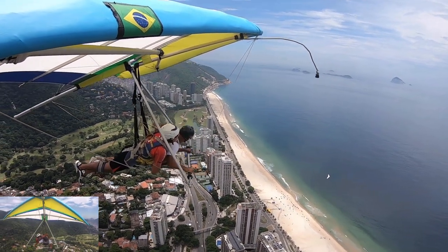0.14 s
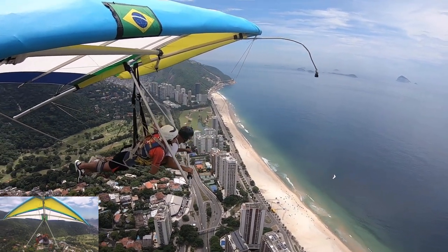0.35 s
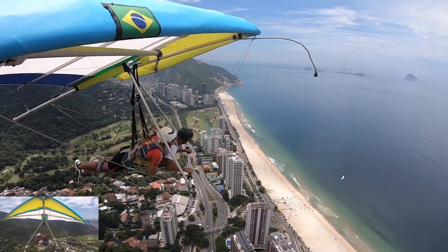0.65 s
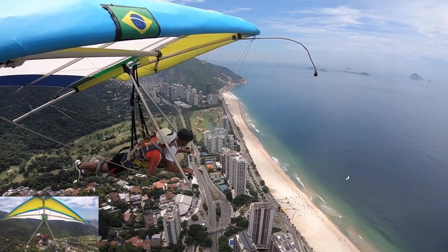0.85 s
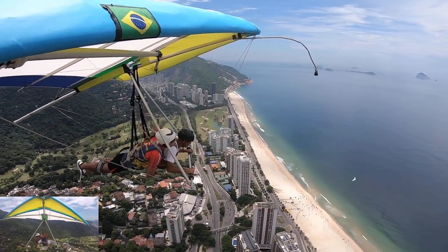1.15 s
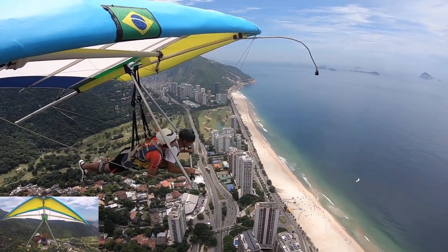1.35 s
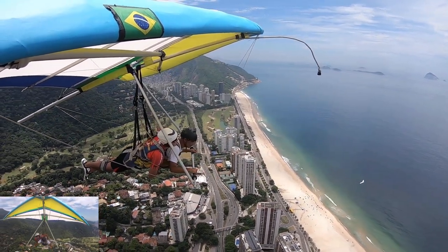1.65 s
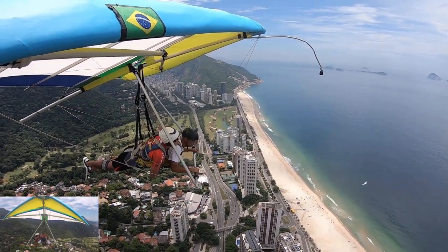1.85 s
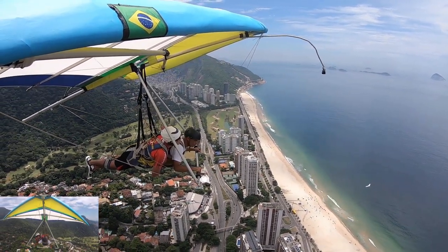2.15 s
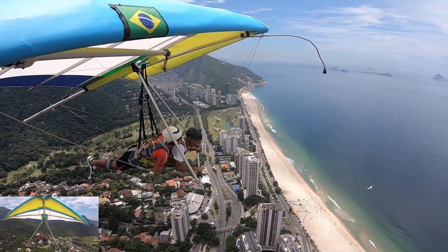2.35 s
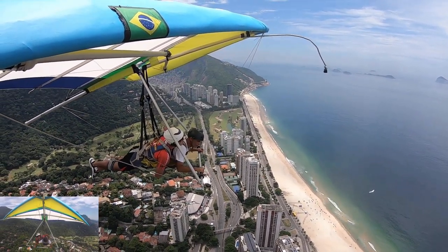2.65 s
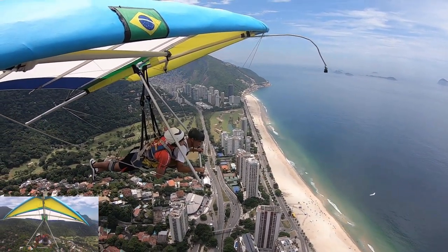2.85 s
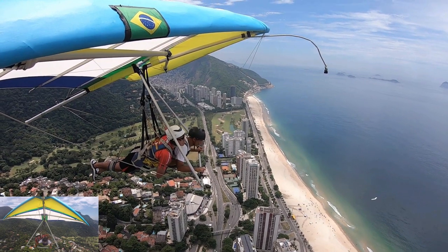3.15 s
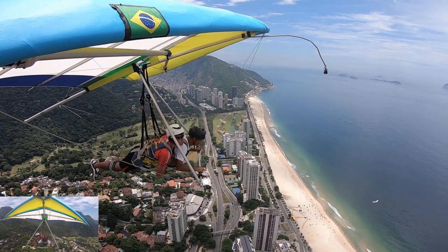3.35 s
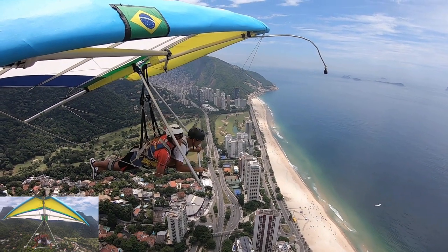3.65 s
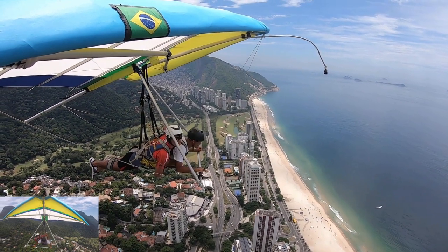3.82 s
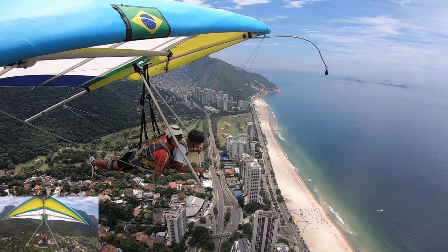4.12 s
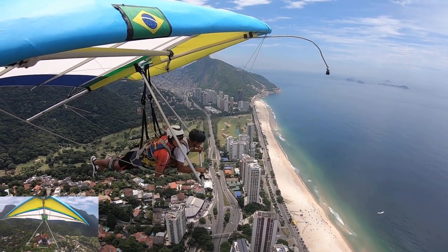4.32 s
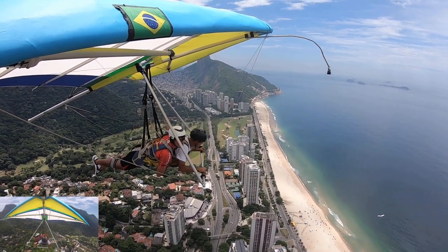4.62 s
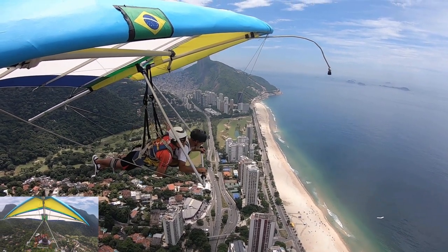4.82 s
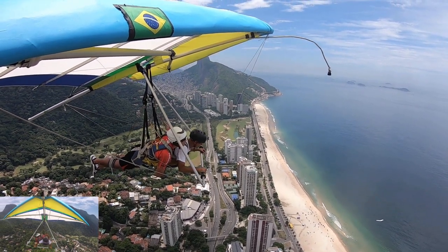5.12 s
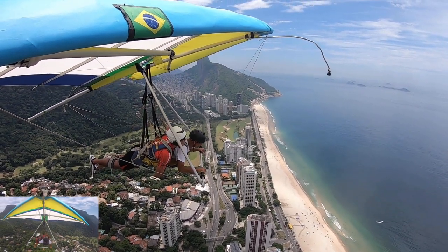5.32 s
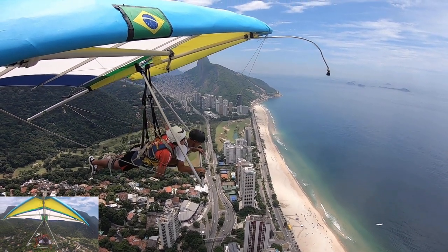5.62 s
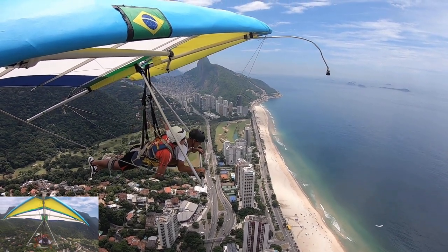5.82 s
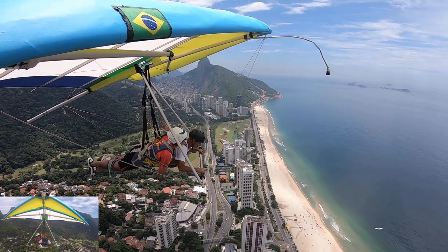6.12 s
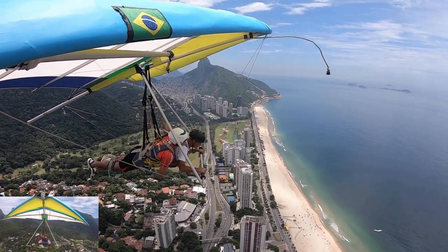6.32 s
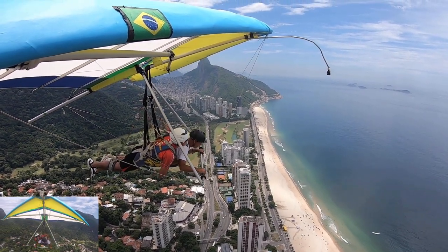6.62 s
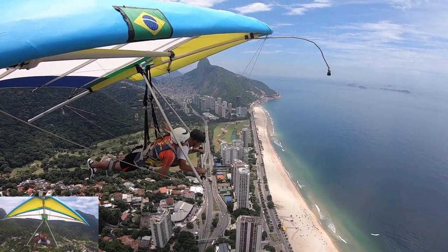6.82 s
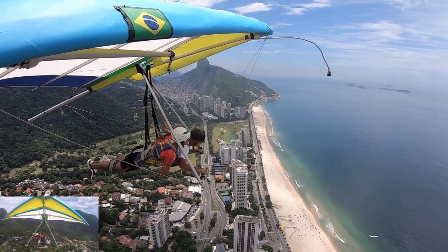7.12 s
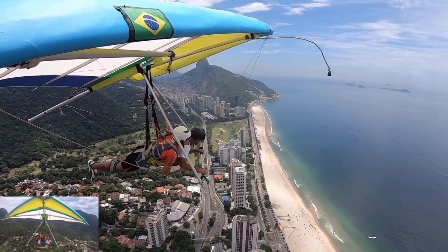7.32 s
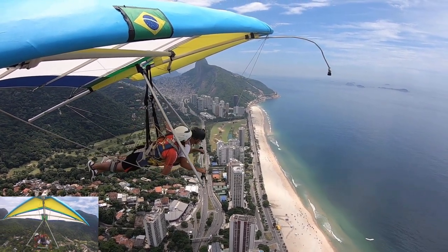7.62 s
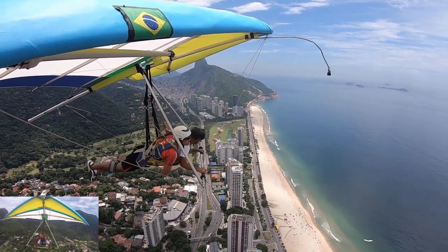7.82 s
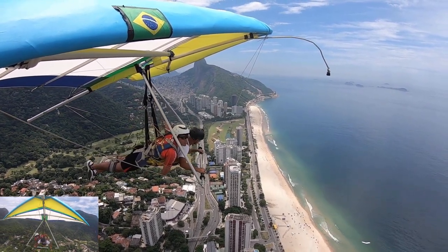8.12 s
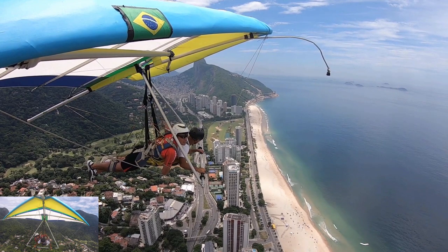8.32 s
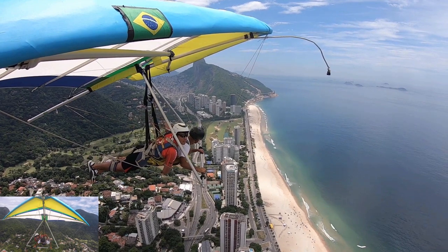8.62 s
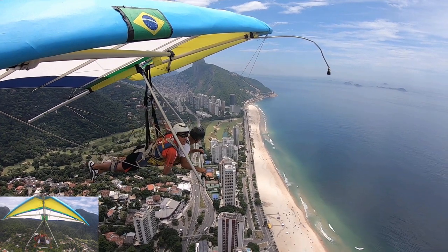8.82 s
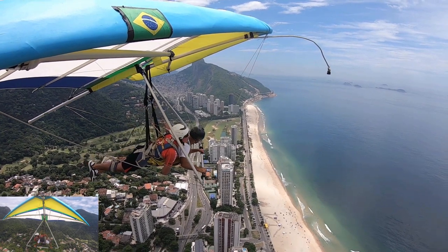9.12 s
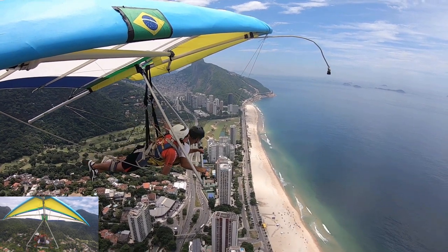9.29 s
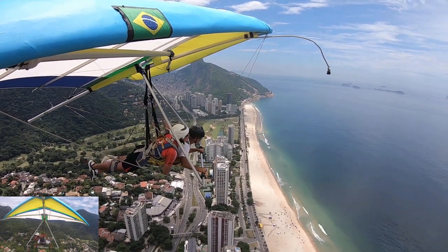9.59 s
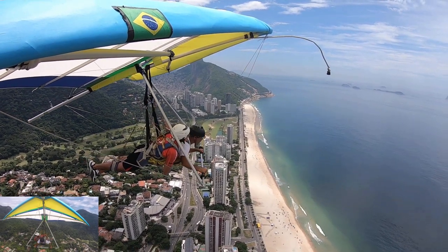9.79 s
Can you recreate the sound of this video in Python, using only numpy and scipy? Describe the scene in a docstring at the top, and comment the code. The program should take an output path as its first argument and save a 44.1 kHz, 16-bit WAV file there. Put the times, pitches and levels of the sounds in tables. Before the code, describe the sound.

A close microphone on a hang glider's wing in steady flight, outdoors with no reverberation. From 0 to 10 seconds wind presses on it as a deep, uneven rumble, mostly below 150 Hz, with lumpy swells, one slightly heavier near 5.2. A faint, steady hiss of air over the sail lies above, with nothing very bright. From about 0.3 a breathy, unstable whistle of noise around 2.5 kHz flutters and ticks rapidly, fairly continuous until roughly 2.8, weaker until 3.4, then full again until about 5. Afterwards it breaks into short, irregular puffs with gaps, continuing to the end. Throughout, tiny millisecond flicks and soft clicks scatter at random, the stronger ones denser before 5 seconds. At about 7.05 and 7.2 two very faint, short, pure high tones near 5.3 kHz sound, almost buried. The wind continues unbroken to the end.

```python
"""A microphone on a glider wing in steady flight. Throughout, turbulent air presses on it as a low rumble (shaped noise),
small eddies flick past its port (short swelling tones), and the airstream over the sail hisses faintly (bright noise).
The shear layer over the port blows its cavity (noise through a resonance): fairly steadily in the first seconds,
again from about 3.5 s, and in broken puffs after about 5 s. Just after 7 s come two faint, short, steady high tones
of unknown source (a sine)."""
import sys
import numpy as np
from scipy import signal
from scipy.fft import rfft, irfft, next_fast_len
from scipy.io import wavfile
from scipy.ndimage import uniform_filter1d

SR = 44100
rng = np.random.default_rng(int(sys.argv[2]) if len(sys.argv) > 2 else 0)


def generate_wav(sig):
    """Save sig (samples, or channels by samples) to the path in sys.argv[1] as 16-bit PCM at SR."""
    pcm = np.round(np.clip(np.atleast_2d(sig).T, -1, 1) * 32767).astype(np.int16)
    wavfile.write(sys.argv[1], SR, pcm)


N = 438794


def from_db(db):
    """Decibels to gain."""
    return 10 ** (np.asarray(db) / 20)


def rms_one(x):
    """Scale to unit rms."""
    return x / np.sqrt(np.mean(x ** 2) + 1e-20)


def in_time(rows):
    """Each column of a table as a value per sample, in straight lines between rows."""
    seconds, *columns = np.transpose(rows)
    return [np.interp(np.arange(N) / SR, seconds, column) for column in columns]


def drift(rate_hz):
    """Slow chance: noise twice through a one-pole low-pass; spread 1."""
    r = np.exp(-2 * np.pi * rate_hz / SR)
    slow = signal.lfilter([1], [1, -2 * r, r * r], rng.standard_normal(N + SR))
    return rms_one(slow[SR:])   # the first second lets the filter settle


def coloured(spectrum):
    """Noise with the given spectrum; rms 1."""
    size = next_fast_len(N)
    hz = np.maximum(np.arange(size // 2 + 1) * SR / size, 1)
    points = np.array(spectrum)
    gain = from_db(np.interp(np.log(hz), np.log(points[:, 0]), points[:, 1]))
    return rms_one(irfft(rfft(rng.standard_normal(size)) * gain, size)[:N])


def swells(rows, edge_s):
    """Rise, hold and fall for each row of start, length and height."""
    steps = np.zeros(N)
    for start_s, length_s, height in rows:
        steps[int(start_s * SR):int((start_s + length_s) * SR)] = height
    return uniform_filter1d(steps, size=max(int(edge_s * SR), 1))


def low_pass(x, hz, run=signal.sosfilt):
    """Second-order low-pass."""
    return run(signal.butter(2, hz, fs=SR, output="sos"), x)


# The airstream. Each row: time in seconds, deep buffet in dB, fine buffet in dB, middle of the hiss level in dB.
AIRSTREAM = [(0.0, -33, -32.5, -56), (0.05, -30, -34, -59), (1.58, -31.5, -32, -61),
             (2.13, -28.5, -33, -60), (4.57, -31, -32.5, -61.5), (5.18, -26.5, -35, -60),
             (5.54, -30.5, -33.5, -60.5), (6.07, -28.5, -34, -60), (7.29, -29, -33.5, -59.5),
             (8.01, -28.5, -34.5, -59.5), (9.67, -32, -33.5, -59), (9.84, -28.5, -33, -59.5),
             (9.95, -27, -35, -60)]


def airstream():
    """The slow course of the wind: levels of deep buffet, fine buffet and hiss."""
    return in_time(AIRSTREAM)


# Faint, short, steady high tones of unknown source. Each row: start in seconds, length in seconds.
FAINT_TONES = [(7.05, .09), (7.2, .07)]
TONE_HZ, TONE_DB, TONE_EDGE_S = 5315, -69, 0.02


def faint_tones():
    """A faint sine of steady pitch that rises, holds and falls."""
    level = swells([(start_s, length_s, from_db(TONE_DB)) for start_s, length_s in FAINT_TONES], TONE_EDGE_S)
    return level * np.sqrt(2) * np.sin(2 * np.pi * TONE_HZ * np.arange(N) / SR)


# Colour of the hiss. Each row: frequency in Hz, relative level in dB per Hz.
HISS_SPECTRUM = [(2500, -21.5), (3500, -3), (4200, 0.5), (5200, 1), (6500, -4.5), (7900, -9.5), (9000, -24)]


def hiss(level_db):
    """Air over the sail: bright noise whose level flickers by chance."""
    return from_db(level_db + 0.68 * drift(42)) * coloured(HISS_SPECTRUM)


# The flow over the port between puffs. Each row: time in seconds, blowing in dB, port pitch in Hz when the
# flow clings fully and before it wanders, attachment in spreads of chance.
STEADY_FLOW = [(0, -49, 2670, 0.33), (.28, -47.5, 2630, .4), (.33, -42.5, 2560, 1.6), (.8, -42, 2536, 1.85),
               (2, -42, 2600, 1.8), (2.8, -42.5, 2650, 0.65), (3.3, -45, 2700, .6), (3.45, -43, 2680, 2.5),
               (4.2, -42, 2520, 2.1), (4.8, -42.5, 2500, 2.3), (5.1, -47, 2510, 0.36),
               (6.5, -46.5, 2490, 0.54), (7.5, -46.5, 2640, 0.42), (8.5, -48.5, 2650, 0.54),
               (9.95, -46.5, 2620, .55)]
# Puffs of air across the port. Each row: start in seconds, length in seconds, blowing in dB before edge smoothing.
AIR_PUFFS = [(.2, 0.05, -42), (0.806, 0.03, -38.5), (0.96, 0.062, -40.5), (1.58, 0.045, -42.5),
             (3.24, 0.027, -40.5), (3.302, 0.017, -39), (3.553, 0.071, -38), (4.522, 0.029, -40),
             (4.683, 0.052, -40.5), (4.98, 0.046, -41.5), (5.148, 0.068, -44), (5.275, 0.052, -45.5),
             (5.34, .098, -46), (5.478, 0.04, -42), (5.596, 0.032, -44), (5.636, 0.12, -44),
             (5.837, 0.06, -43.5), (6.07, 0.023, -42), (6.116, 0.1, -45), (6.317, .06, -44.5),
             (6.379, 0.038, -44), (6.454, 0.033, -45.5), (6.825, 0.044, -46), (7.199, 0.032, -38),
             (7.264, 0.076, -45), (7.336, 0.12, -41.5), (7.552, 0.041, -45), (7.732, 0.055, -46),
             (7.848, .041, -44), (7.934, 0.04, -44), (8.042, 0.046, -44), (8.127, .04, -45.5),
             (8.268, 0.023, -42), (8.4, 0.046, -40.5), (8.5, 0.11, -46), (8.703, 0.056, -41),
             (8.827, .03, -45), (8.887, 0.06, -39.5), (8.957, .06, -47.5), (9.224, .15, -46),
             (9.492, 0.077, -44), (9.585, .061, -42.5), (9.75, 0.027, -39.5), (9.794, 0.035, -43.5),
             (9.9, 0.042, -43)]
PUFF_EDGE_S, PUFF_GRIP = 0.018, 1.35   # rise and fall; attachment gained in a puff, in spreads


def port_flow():
    """Blowing gain, port pitch and attachment: in a puff the air blows harder and attaches better."""
    blowing_db, port_hz, attachment = in_time(STEADY_FLOW)
    puff_gain = swells([(start_s, length_s, from_db(db)) for start_s, length_s, db in AIR_PUFFS], PUFF_EDGE_S)
    puff_grip = swells([(start_s, length_s, PUFF_GRIP) for start_s, length_s, _ in AIR_PUFFS], PUFF_EDGE_S)
    return np.maximum(from_db(blowing_db), puff_gain), port_hz, attachment + puff_grip


def clinging(pressure, attachment, lead_s, share, lull_ms, lull, catch):
    """How firmly the flow clings to the port, -1 to 1: it lifts before a strong eddy and catches behind it."""
    swell = low_pass(pressure, 60)
    # a burst runs just ahead of a pressure swell
    cling = attachment + share * rms_one(np.roll(swell, -int(lead_s * SR)))
    cling = cling + 0.91 * drift(47) + 0.42 * drift(17)
    t = np.arange(-660, 660) / SR * 1000 / lull_ms
    stretch = np.where(t < 0, 1, 2)   # the catch lasts twice as long as the lull
    lull_and_catch = np.where(t < 0, -lull, catch) * np.exp(-(t / stretch) ** 2)
    marks = np.zeros(N)
    marks[[int(row[0] * SR) for row in STRONG_EDDIES]] = 1
    return np.tanh(cling + signal.fftconvolve(marks, lull_and_catch, "same"))


def resonance(x, hz, width_hz):
    """A resonance of gain 1 on top, its pitch moved block by block."""
    out, state, r = np.zeros(N), [0., 0.], np.exp(-np.pi * width_hz / SR)
    top = (1 - r * r) / 2
    for i in range(0, N, 512):
        poles = [1, -2 * r * np.cos(2 * np.pi * hz[i] / SR), r * r]
        out[i:i + 512], state = signal.lfilter([top, 0, -top], poles, x[i:i + 512], zi=state)
    return out


# Colour of the shear noise. Each row: frequency in Hz, relative level in dB per Hz.
SHEAR_SPECTRUM = [(300, -24.5), (700, -11.5), (1400, -6), (2000, -2.5), (2800, -8.5), (3300, -11.5),
                  (4500, -23.5), (8000, -43.5)]
PORT_WIDTH_HZ, PORT_DB = 650, 11   # width of each of two resonances in a row; gain of their ringing
PORT_SAG = 0.026   # the pitch sags by this share as cling rises by 1


def port(cling, hz, depth_db, flutter_db, wander):
    """Shear noise rings in the port cavity while the flow clings to it and falls away when it lifts."""
    shear = coloured(SHEAR_SPECTRUM) * from_db(depth_db * (cling - 1))
    # the pitch follows small changes of air speed
    hz = hz * (1 + wander * drift(29) + PORT_SAG * (1 - cling))
    ringing = resonance(resonance(shear, hz, PORT_WIDTH_HZ), hz, PORT_WIDTH_HZ)
    # the direct noise comes in ticks
    ticking = shear * from_db(flutter_db * 2 * np.tanh(drift(150) / 2))
    blown = ticking + from_db(PORT_DB) * ringing
    # evened over a third of a second, so that the blowing sets the mean level
    return blown / np.sqrt(uniform_filter1d(blown ** 2, size=SR // 3) + 1e-9)


def add_eddy(out, centre_s, peak_db, hz, width_ms, phase):
    """One eddy: a few cycles that swell and fade in a bell shape."""
    t = np.arange(-220, 220) / SR
    at = int(np.clip(centre_s * SR, 220, N - 220))
    bell = np.exp(-.5 * (1000 * t / (width_ms / 2)) ** 2)
    out[at - 220:at + 220] += from_db(peak_db) * bell * np.cos(2 * np.pi * hz * t + phase)


# Strong eddies at the port. Each row: start in seconds, peak in dB, pitch in Hz, peak of the thud in dB.
STRONG_EDDIES = [(0.0986, -29.5, 2060, -37), (0.2046, -31, 2550, -42), (0.3153, -34, 2770, -43),
                 (0.3305, -23.5, 2560, -46), (0.4545, -24.5, 2560, -41), (0.61, -26, 2530, -34),
                 (0.693, -31, 2620, -36), (0.9098, -25, 2150, -37), (1.3892, -29, 2400, -39),
                 (1.6008, -26, 2150, -36), (1.8721, -28, 2640, -41), (2.2593, -29, 2500, -41),
                 (2.5421, -27, 2770, -41), (2.675, -28, 2470, -45), (3.239, -31, 2780, -42),
                 (3.3097, -29, 2520, -42), (3.3366, -30, 2470, -42), (3.4084, -27, 2600, -38),
                 (3.8092, -28, 2430, -45), (3.962, -28, 2330, -43), (4.019, -30, 2560, -33),
                 (4.12, -33, 2540, -37), (4.1908, -25.5, 2440, -32), (4.5306, -25, 2040, -40),
                 (4.539, -25, 2330, -42), (4.691, -25.5, 2630, -36), (4.7634, -28, 2330, -37),
                 (5.0878, -29, 2350, -44), (5.704, -31, 2610, -42), (5.769, -29, 2500, -40),
                 (6.0739, -32, 2390, -43), (6.451, -34, 2350, -42), (6.6338, -34, 1380, -39),
                 (6.9, -33, 2290, -39), (7.02, -34, 2190, -42), (7.3497, -30, 2540, -39),
                 (7.7433, -30, 1950, -37), (7.7697, -31, 2420, -38), (8.0596, -28, 2650, -41),
                 (8.1698, -32, 2380, -43), (8.2412, -38, 1200, -40.5), (8.322, -28, 2590, -46),
                 (8.3759, -30, 2620, -44), (8.4009, -29, 2660, -37), (8.718, -27, 2670, -42),
                 (8.8508, -28, 2440, -44), (8.9875, -34, 1580, -39), (9.255, -29.5, 1300, -35),
                 (9.46, -29, 2590, -39), (9.763, -33, 1260, -36)]
EDDY_MS, THUD_HZ, THUD_MS = 1.303, 1600, 0.9   # each strong eddy has a shorter thud at its centre


def eddies(cling, small_per_s, small_db, depth_db):
    """Eddies flick past the port: strong ones from the table, small ones by chance, louder in clinging flow."""
    strong, small = np.zeros(N), np.zeros(N)
    phases = rng.uniform(0, 2 * np.pi, len(STRONG_EDDIES))
    for (start_s, peak_db, hz, thud_db), phase in zip(STRONG_EDDIES, phases):
        centre_s = start_s + EDDY_MS / 1000
        add_eddy(strong, centre_s, peak_db, hz, EDDY_MS, phase)
        add_eddy(strong, centre_s, thud_db, THUD_HZ, THUD_MS, phase)
    chance = rng.random((3000, 5))
    times = np.cumsum(-np.log(1 - chance[:, 0])) / small_per_s   # random gaps
    for start_s, (_, size, pitch, length, turn) in zip(times[times < N / SR], chance):
        width_ms = 0.32 + .5 * length
        peak_db, hz = small_db + 9 * size ** 2, 1000 * 2.5 ** pitch
        add_eddy(small, start_s + width_ms / 1000, peak_db, hz, width_ms, 2 * np.pi * turn)
    return strong + small * from_db(depth_db * cling)


# Colour of the rumble before evening and splitting. Each row: frequency in Hz, relative level in dB per Hz.
BUFFET_SPECTRUM = [(10, -28.5), (21, -4.5), (30, 0), (52, 1), (68, 1), (85, -0.5), (120, -2.5), (170, -5.5),
                   (250, -11), (500, -18.5), (1000, -30), (2000, -38), (3500, -44), (8000, -74.5)]
SPLIT_HZ = 140   # between deep and fine buffet


def buffet(deep_db, fine_db, evenness, window_s):
    """Pressure of large and middling eddies on the diaphragm; gain control partly evens out its lumps."""
    rumble = coloured(BUFFET_SPECTRUM)
    power = uniform_filter1d(rumble ** 2, size=max(int(window_s * SR), 3))
    rumble = rumble * (power + 0.055) ** (-evenness / 2)
    deep = low_pass(rumble, SPLIT_HZ, signal.sosfiltfilt)
    return from_db(deep_db) * rms_one(deep) + from_db(fine_db) * rms_one(rumble - deep)


def scene():
    """Rumble, port bursts, eddies, hiss and faint tones at one capsule."""
    deep_db, fine_db, hiss_db = airstream()
    blowing, port_hz, attachment = port_flow()
    pressure = buffet(deep_db, fine_db, evenness=0.15, window_s=0.069)
    cling = clinging(pressure, attachment, lead_s=0.0071, share=1.0, lull_ms=6.4, lull=1.8, catch=0.96)
    bursts = blowing * port(cling, port_hz, depth_db=9.5, flutter_db=5.0, wander=0.032)
    flicks = eddies(cling, small_per_s=140, small_db=-42.5, depth_db=4.5)
    return (faint_tones() + hiss(hiss_db) + bursts + flicks + pressure)[None]


CUTOFF_HZ = 8060


def record(dry):
    """The top is cut steeply by an elliptic low-pass."""
    return signal.sosfilt(signal.ellip(10, .5, 60, CUTOFF_HZ, fs=SR, output="sos"), dry)


dry = scene()
out = record(dry)
generate_wav(out)
```